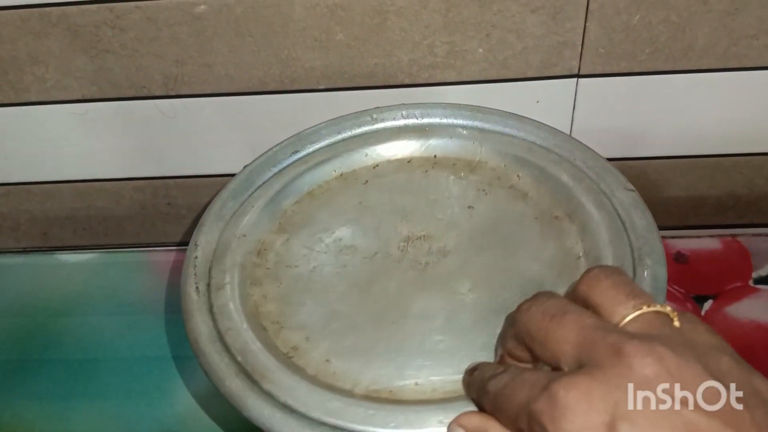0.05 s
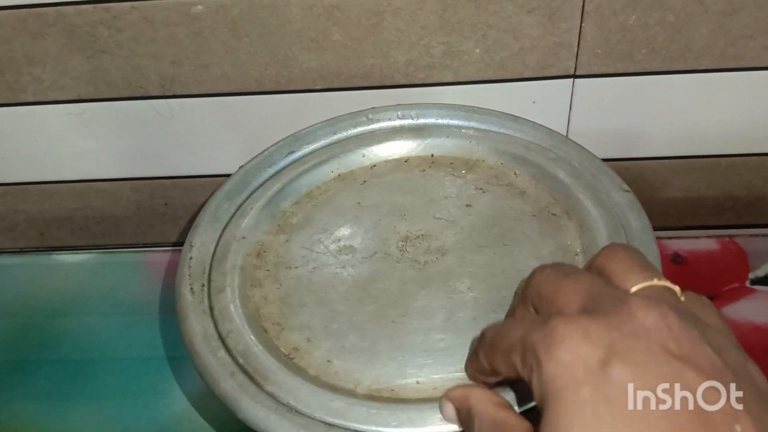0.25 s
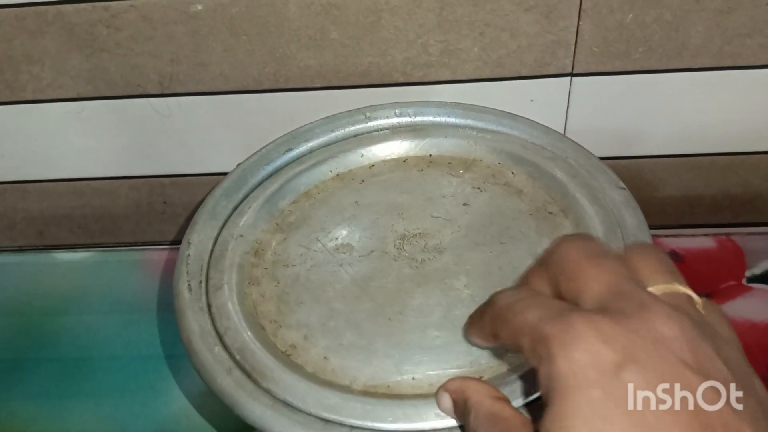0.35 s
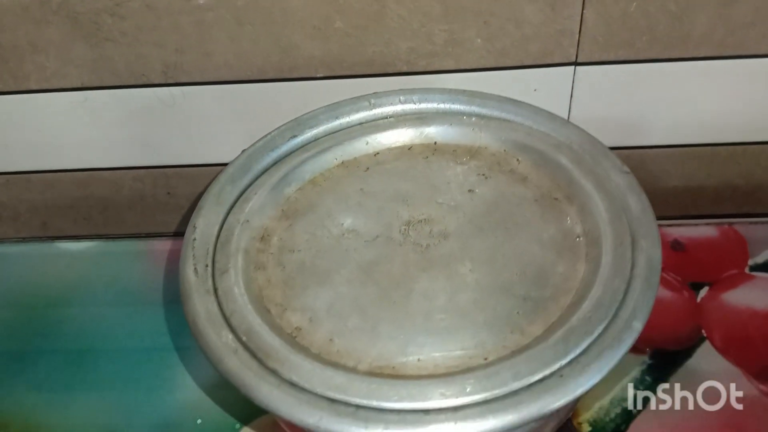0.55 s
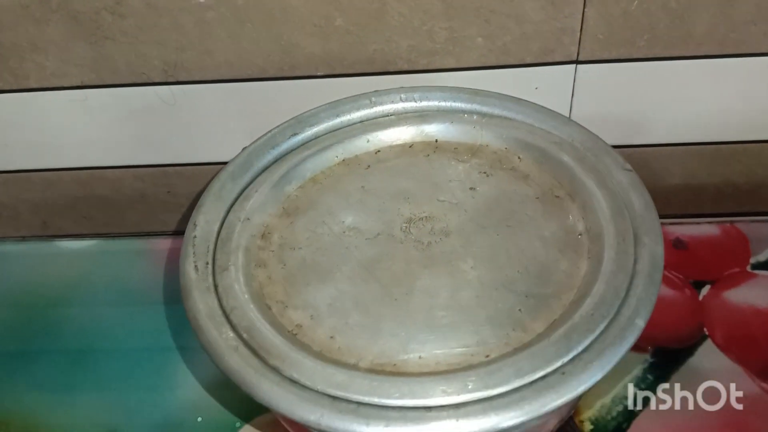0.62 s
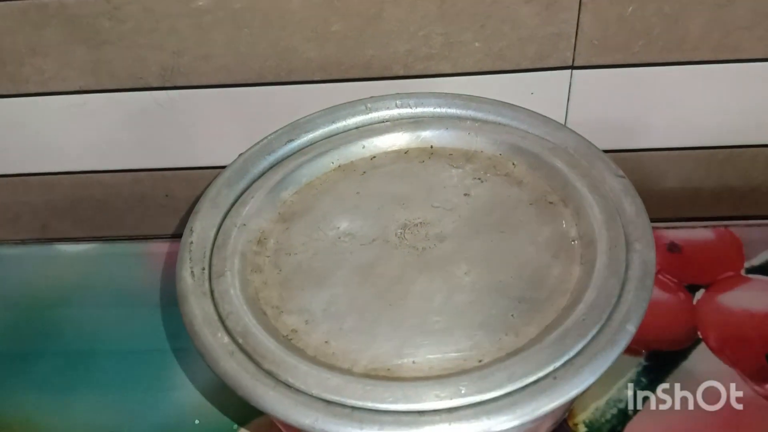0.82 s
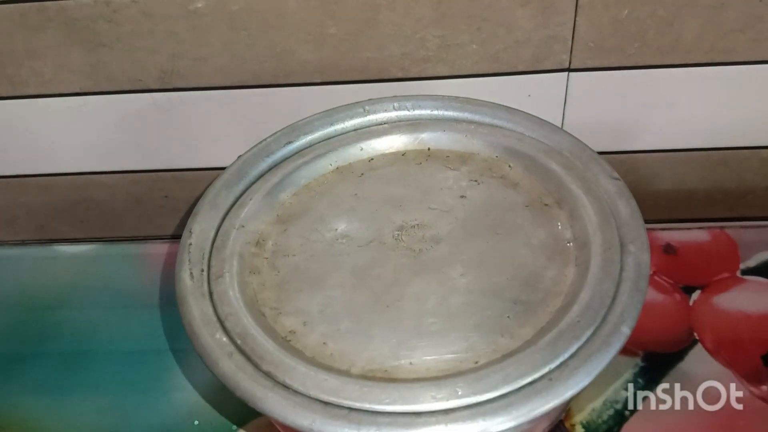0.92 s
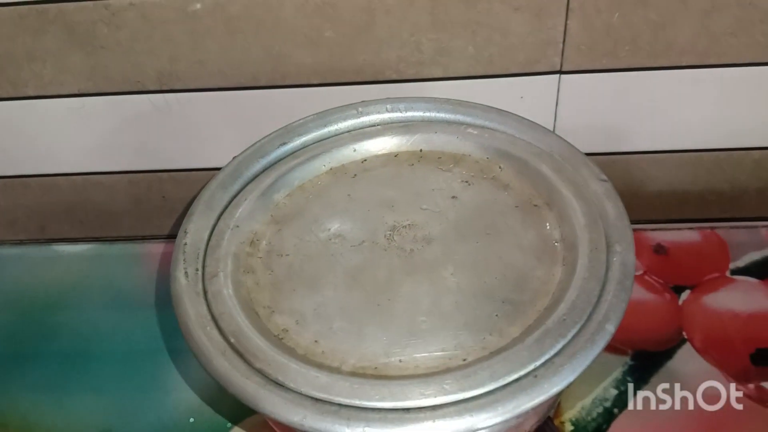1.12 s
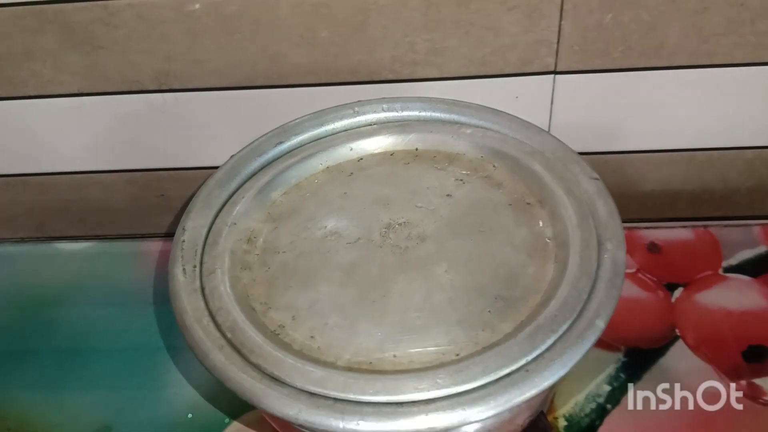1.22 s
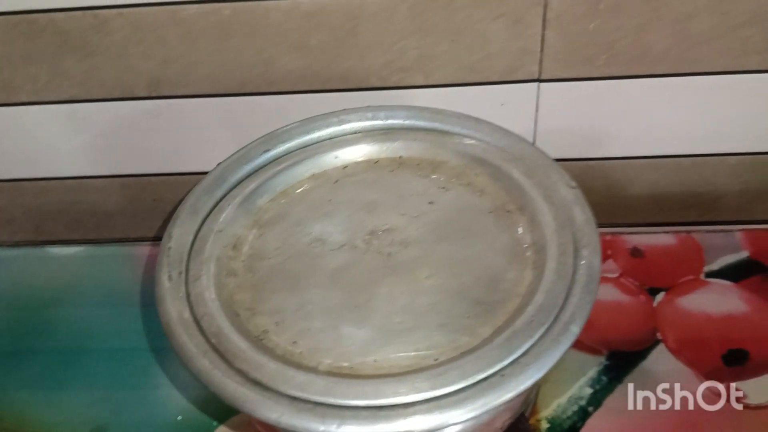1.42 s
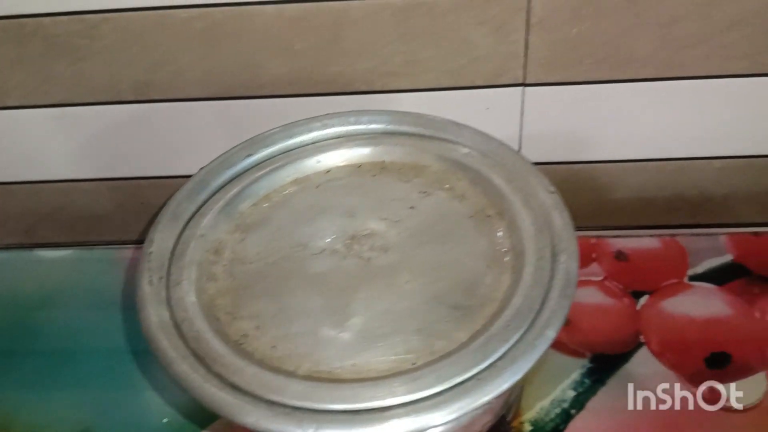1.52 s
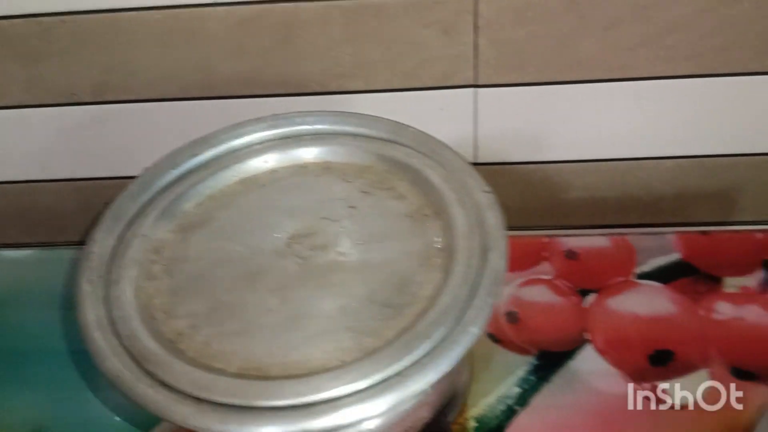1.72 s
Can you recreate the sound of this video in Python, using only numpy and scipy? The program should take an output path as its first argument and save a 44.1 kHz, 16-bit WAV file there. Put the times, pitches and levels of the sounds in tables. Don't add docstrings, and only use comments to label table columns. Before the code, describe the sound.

A thin metal lid scrapes briefly, clangs down onto a metal pot, then gets a light tap

```python
import sys
import numpy as np
from scipy import signal
from scipy.fft import rfft, irfft
from scipy.io import wavfile
from scipy.ndimage import uniform_filter1d

SR = 44100
rng = np.random.default_rng(int(sys.argv[2]) if len(sys.argv) > 2 else 0)


def amp(db):
    return 10 ** (np.asarray(db, float) / 20)


def write(x):
    x = np.atleast_2d(x).T
    wavfile.write(sys.argv[1], SR, np.round(np.clip(x, -1, 1) * 32767).astype(np.int16))


N = 77175
RIGHT_LAG_S = .00043
BODY_SCATTER_DB = 1.2


def curve(table, hz):
    a = np.array(table, float)
    return np.interp(np.log(np.maximum(hz, 1)), np.log(a[:, 0]), a[:, 1])


def unit(x):
    return x / np.sqrt(np.mean(x ** 2))


def walk(rate_hz):
    k = int(SR / rate_hz)
    steps = np.repeat(rng.standard_normal(N // k + 1), k)
    return unit(uniform_filter1d(uniform_filter1d(steps, k), k)[:N])


def octave(f, hz):
    return np.cos(np.pi / 2 * np.clip(np.log2(f / hz + 1e-9), -1, 1)) ** 2


# [f/Hz, level/dB]
PORTS = [(60, 1), (140, -4), (300, 6.5), (700, 0.5), (1290, 3.5), (2380, -3.5), (4400, -9), (8120, -13),
         (15000, -1)]


def ring(modes, count=1, scatter_db=-3.5):
    hz, db, t60_s = np.array(modes, float).T
    t = np.arange(SR // 3) / SR
    decay = np.log(1000) / np.clip(t60_s, .005, .36)
    waves = np.exp(np.outer(2j * np.pi * hz - decay, t)).astype(np.complex64)

    wobble_db, wobble_per_s = 1.8, 25
    rock = rng.standard_normal((len(hz), 12)) * (t60_s > .085)[:, None] * (np.arange(12) > 0)
    for k in np.flatnonzero(rock[:, 1]):
        waves[k] *= amp(wobble_db * np.interp(t * wobble_per_s, np.arange(12), rock[k]))

    shape = (count, len(hz))
    lag_s = RIGHT_LAG_S * np.where(hz < 1100, .6, 1)
    turn = np.minimum(hz / 1000, 1) * rng.standard_normal(shape) - 2 * np.pi * hz * lag_s
    side = amp(curve(PORTS, hz) / 2)
    gain = amp(db + scatter_db * rng.standard_normal(shape))
    gain = gain * np.sign(rng.standard_normal(shape) + 3 * (hz < 1000))
    ports = np.stack([gain * side, gain / side * np.exp(1j * turn)], 1)
    out = (ports.astype(np.complex64) @ waves).imag
    out[:, 1, :int(RIGHT_LAG_S * SR)] = 0
    return out / np.sqrt(np.mean(out[..., :SR // 100] ** 2))


def sheet(colour, count=1):
    hz = 400 * 40 ** (rng.random(200) ** .7)
    t60_s = .033 * np.exp(.27 * rng.standard_normal(200))
    modes = np.array([hz, curve(colour, hz) + 5 * np.log10(hz), t60_s]).T
    return ring(modes, count=count, scatter_db=5.0)


# [t/s, level/dB]
SLIDE_PRESS = [
    (0.0, -37),
    (0.039, -48.5),
    (0.058, -33),
    (0.076, -50.5),
    (0.144, -43),
    (0.199, -38.5),
    (0.205, -17),
]
# [f/Hz, level/dB]
SLIDE_SHEET = [(240, -41), (400, -35), (452, -3.5), (615, -42), (863, -18), (2380, -28), (8020, -25),
               (15800, -44.5)]
# [f/Hz, level/dB, t60/s]
HELD_LID = [(1470, -8, .08), (1680, -4, .05), (2630, -2, .06), (2860, -8, .08), (3400, -7, .07),
            (4080, -5, .05), (4920, -8, .06), (5260, -9, .06), (6500, -7, .05), (7520, -12, .05),
            (7815, -4, .05), (8210, -11, .05), (8680, -9, .04)]
# [f/Hz, level/dB, t60/s]
GAP_MODES = [(466.7, -3, 0.17), (904, 0, 0.07), (142, -17, 0.14)]
# [t/s, low ratio, upper ratio]
GAP_PITCH = [(0, 1.12, 1.1), (.045, 1.0, .97), (.1, 1.0, 1.1), (.14, .97, 1.06), (.205, .95, 1.15)]


def slide():
    clicks_per_s, scatter_db, gap_split_hz = 2600, 4, 680
    t = np.arange(N) / SR
    press, pitch = np.array(SLIDE_PRESS), np.array(GAP_PITCH)
    push = amp(np.interp(t, press[:, 0], press[:, 1]) + 2.7 * walk(56.8)) * (t < press[-1, 0])
    metal_rings = sheet(SLIDE_SHEET, count=3) + amp(-2) * ring(HELD_LID, count=3)
    air_rings = ring(GAP_MODES, count=3)
    clocks = [np.cumsum(np.interp(t, pitch[:, 0], pitch[:, k])) for k in (1, 2)]
    split = signal.butter(4, gap_split_hz, fs=SR, output="sos")

    out = np.zeros((2, N))
    for metal_ring, air_ring in zip(metal_rings, air_rings):
        when, sign, size = rng.random((3, N))
        clicks = (when < clicks_per_s / 3 / SR) * np.sign(sign - .5)
        clicks = clicks * amp(-scatter_db * np.log(size + .06))
        drive = unit(clicks)[None] * push
        out += signal.fftconvolve(drive, metal_ring, axes=1)[:, :N]
        air = signal.fftconvolve(drive, air_ring, axes=1)[:, :N]
        low = signal.sosfiltfilt(split, air)
        for clock, part in zip(clocks, (low, air - low)):
            out += np.array([np.interp(clock, np.arange(N), port) for port in part])
    return out * amp(-34.0)


# [f/Hz, level/dB]
ROOM_PORTS = [(60, 1), (110, -3.5), (200, 3), (380, 2.5), (700, -0.5), (1290, 3.5), (2380, -3), (4400, -5),
              (8120, -7.5), (15000, 6.5)]
# [f/Hz, share/0-1]
ALIKE = [(60, 1), (300, 0.61), (1000, 0.24), (8000, 0.043)]


def hiss(gain):
    f = np.fft.rfftfreq(N, 1 / SR)
    alike = np.clip(curve(ALIKE, f), 0, .99)
    common, own_left, own_right = rfft(rng.standard_normal((3, N)), axis=1)
    side = amp(curve(ROOM_PORTS, f) / 2)
    shared = np.sqrt(alike) * common
    left = shared * np.exp(2j * np.pi * f * RIGHT_LAG_S) + np.sqrt(1 - alike) * own_left
    right = shared + np.sqrt(1 - alike) * own_right
    return irfft(np.array([left * side, right / side]) * gain(f), N, axis=1)


def bump(hz, width_hz):
    return unit(hiss(lambda f: np.exp(-((f - hz) / width_hz) ** 2 * 2)))


# [f/Hz, level/dB per Hz]
KITCHEN = [(15, -30), (35, -6), (120, -4.5), (152, -20.5), (342, -19), (527, -20), (1220, -24), (9450, -34),
           (15800, -42)]
# [f/Hz, width/Hz, level/dB]
HUMPS = [
    (50, 24.5, -61),
    (137, 54, -68),
    (7530, 500, -69.5),
    (8650, 2000, -65.5),
    (9680, 120, -71),
]
# [t/s, length/s, f/Hz, width/Hz, level/dB]
PIPE = (1.07, .17, 521, 28, -63)
FAR_S = [.93, 1.58, .62, 1.1, .44, .54, .77, .36]
# [length/s, f/Hz, width/Hz, level/dB]
FAR = [
    (0.073, 8900, 4100, -57.5),
    (0.072, 6200, 6100, -61.5),
    (0.082, 8200, 3900, -59),
    (0.11, 8500, 4500, -64),
    (0.13, 8200, 3400, -58),
    (0.29, 48, 43, -52),
    (0.047, 52, 39, -48.5),
    (.1, 110, 110, -61.5),
]


def kitchen():
    flicker_db, duck_full_db, duck_back_s = .9, -5, .415
    t = np.arange(N) / SR
    duck_db = duck_full_db * (t > .21) / (1 + np.exp(np.clip((t - duck_back_s) / .015, -30, 30)))
    bed = np.zeros((2, N))
    for hz in 30 * 2. ** np.arange(10):
        level_db = flicker_db * walk(6.85) + duck_db * (hz > 200)
        bed += amp(level_db) * hiss(lambda f: amp(curve(KITCHEN, f)) * octave(f, hz))
    out = unit(bed) * amp(-51.5 - 3.5)
    for hz, width_hz, db in HUMPS:
        out += amp(db + .86 * walk(9.64) + duck_db * (hz > 200)) * bump(hz, width_hz)
    pipe_s, length_s, hz, width_hz, db = PIPE
    out += amp(db) * np.exp(-((t - pipe_s) / length_s) ** 2 * 4) * bump(hz, width_hz)
    for at_s, (length_s, hz, width_hz, db) in zip(FAR_S, FAR):
        out += amp(db) * np.exp(-((t - at_s) / length_s) ** 2 * 4) * bump(hz, width_hz)
    return out


# [t/s, length/s, level/dB, chatter f/Hz]
SCRAPES = [(.001, .005, -42.5, 2630), (.012, .005, -47, 2630), (0.037, .005, -51.5, 2630),
           (.1575, .008, -45.5, 3400), (.177, .003, -39, 2630), (0.188, .006, -45, 2630),
           (.193, .004, -32, 4080), (0.1934, 0.0054, -39.5, 1680), (0.217, .004, -22, 7815),
           (.245, .008, -34.5, 2860), (.298, .008, -43, 2610), (0.334, 0.0072, -44.5, 4090),
           (.488, 0.0087, -57, 4920)]


def scrapes():
    out = np.zeros((2, N + SR))
    t = np.arange(SR // 50) / SR
    rings = ring(HELD_LID, count=len(SCRAPES), scatter_db=2)
    for (at_s, length_s, db, hz), response in zip(SCRAPES, rings):
        chatter = .45 * (1 + (hz > 3000)) * np.sin(2 * np.pi * hz * t)
        rub = (rng.standard_normal(len(t)) + chatter) * np.exp(-t / max(length_s, .001))
        y = signal.fftconvolve(rub[None] / np.sqrt(np.sum(rub ** 2)), response, axes=1)
        i = int(at_s * SR)
        out[:, i:i + y.shape[1]] += amp(db - 9) * y
    return out[:, :N]


def soften(x):
    k = np.hanning(max(int(.00077 * SR), 3))
    k = (k / k.sum()).reshape((1,) * (x.ndim - 1) + (-1,))
    return signal.fftconvolve(x, k, axes=-1)[..., :x.shape[-1]]


def hits(contacts, clear, clear_db, clear_at, colour, low):
    n, out = len(contacts), np.zeros((2, N + SR))
    bright = sheet(colour, count=n)
    body = soften(ring(low, count=n, scatter_db=BODY_SCATTER_DB))
    bright[clear_at] += amp(clear_db) * ring(clear, scatter_db=BODY_SCATTER_DB)[0]
    for (at_s, click_db, thump_db), click, thump in zip(contacts, bright, body):
        i = int(at_s * SR)
        out[:, i:i + click.shape[1]] += amp(click_db - 8.5) * click + amp(thump_db - 10.5) * thump
    return out[:, :N]


# [t/s, click/dB, thump/dB]
KNOCKS = [
    (.0542, -46, -24.5),
    (.0585, -50.5, -20.5),
    (.0628, -64, -23.5),
    (.101, -35.5, -33.5),
    (.1375, -45, -36),
    (.1575, -51, -28.5),
]
# [f/Hz, level/dB, t60/s]
KNOCK_LOW = [(460, 2, 0.06), (205, -12.5, .06), (870, -13, 0.07), (2200, 3, .035)]


def knocks():
    return hits(KNOCKS, HELD_LID, -8, 1, SLIDE_SHEET, KNOCK_LOW)


# [t/s, click/dB, thump/dB]
DROP = [(.1935, -52, -36), (.2075, -22.5, -47), (.2108, -11.5, -15), (.2135, -11.5, -16.5),
        (.2165, -2.5, -16.5), (.219, -15, -23.5), (.2200, -14, -12), (.2235, -15, -6.5), (.2258, -18, -30),
        (.2295, -19, -9), (.2325, -17.5, -31), (.2365, -39, -30)]
# [f/Hz, level/dB, t60/s]
SEATED_LID = [(1491, -16, .3), (1609, -10, .15), (1836, -6, .09), (2315, -11, .33), (2584, 0, .27),
              (2840, 2, .17), (2890, -10, .33), (3171, -9, .18), (3480, -2, .19), (3618, -6, .17),
              (4115, 0, .11), (4929, 3, .17), (6315, -4, .17), (6750, 2, .06)]
# [f/Hz, level/dB]
DROP_SHEET = [(240, -33), (400, -5), (561, -14.5), (1860, -8), (2340, -13.5), (4200, -11.5), (7200, -19.5),
              (7770, -16), (15800, -44)]
# [f/Hz, level/dB, t60/s]
POT = [(140, -8, .12), (229, -3, .085), (301, -11, .24), (312, 0, .065), (384, -14, .18), (424, -3, .07),
       (668, -10, .06), (940, -22, .25)]


def drop():
    return hits(DROP, SEATED_LID, 3, 6, DROP_SHEET, POT)


# [t/s, click/dB, thump/dB]
TAP = [
    (.4660, -52, -44),
    (.4690, -32, -30),
    (.4715, -31, -30.5),
    (.4742, -32, -22),
    (.4775, -35.5, -55),
    (.4845, -44, -29.5),
]
# [f/Hz, level/dB, t60/s]
TAPPED_LID = [(1529, -12, .13), (1782, 2, .04), (2200, -6, .06), (2503, -5, .055), (2864, -18, .1),
              (3623, -9, .07), (3854, -10, .1), (5071, -17, .11), (5566, -7, .05), (6379, -12, .08),
              (6869, -14, .1), (7747, -11, .11), (8263, -17, .1), (9200, -15, .05)]
# [f/Hz, level/dB]
TAP_SHEET = [(400, -36), (1200, -3.5), (1800, -3.5), (3900, -8.5), (4700, -46), (5400, -13), (8500, -24),
             (15800, -44)]
# [f/Hz, level/dB, t60/s]
TAPPED_POT = [(135, 0, .12), (300, -17, .16), (420, 0, .055), (388, -19, .11), (660, -7, .06),
              (220, -16, .12)]


def tap():
    return hits(TAP, TAPPED_LID, -1, 1, TAP_SHEET, TAPPED_POT)


# [f/Hz, t60/s]
TAIL = [(100, 0.32), (300, 0.33), (1000, 0.2), (2500, 0.3), (5000, 0.22), (9000, 0.2), (14000, 0.25)]


def tail(x):
    level_db, rise_s, n = -7.5, .005, SR // 2
    t, f = np.arange(n) / SR, np.fft.rfftfreq(n, 1 / SR)
    noise = rfft(rng.standard_normal((2, n)) + .5 * rng.standard_normal(n), axis=1)
    ir = np.zeros((2, n))
    for hz in 140.0 * 2. ** np.arange(9):
        ir += irfft(noise * octave(f, hz), n, axis=1) * amp(-60 * t / curve(TAIL, hz))
    ir *= np.minimum(t / rise_s, 1)
    ir /= np.sqrt(np.mean(np.sum(ir ** 2, 1)))
    return amp(level_db) * signal.fftconvolve(x, ir, axes=1)[:, :N]


def scene():
    lid = slide() + knocks() + drop() + tap() + scrapes()
    wet = tail(signal.lfilter(*signal.butter(1, 500, "high", fs=SR), lid))
    low_cut = signal.butter(4, 90, "high", fs=SR, output="sos")
    return signal.sosfilt(low_cut, lid + wet) + kitchen()


def low_pass(x):
    return signal.sosfilt(signal.butter(12, 15920, fs=SR, output="sos"), x)


def record(dry):
    rounded = np.tanh(1.168 * dry) / np.tanh(1.1)
    x = signal.sosfilt(signal.ellip(10, .5, 50, 15760, fs=SR, output="sos"), rounded)
    return low_pass(np.clip(x, -1, 1))


dry = scene()
out = record(dry)
write(out)
```